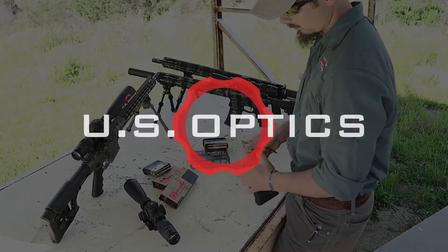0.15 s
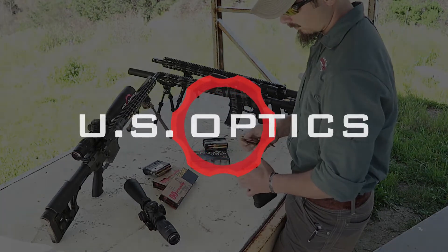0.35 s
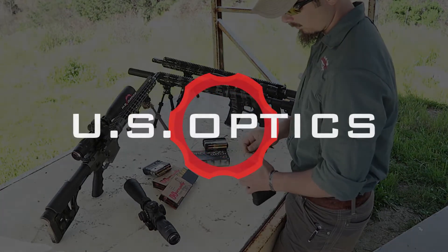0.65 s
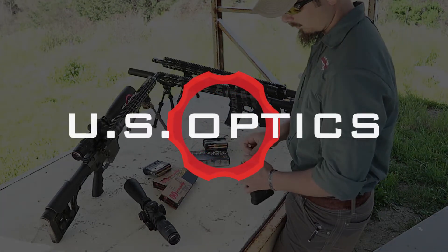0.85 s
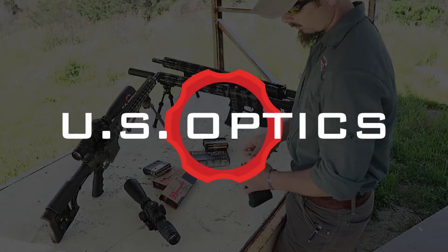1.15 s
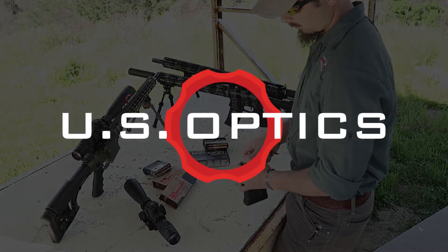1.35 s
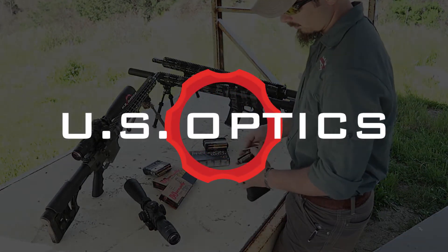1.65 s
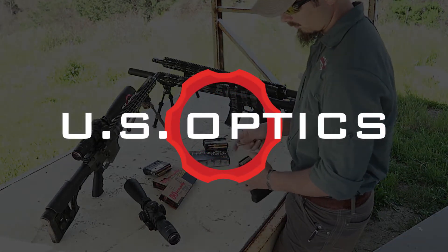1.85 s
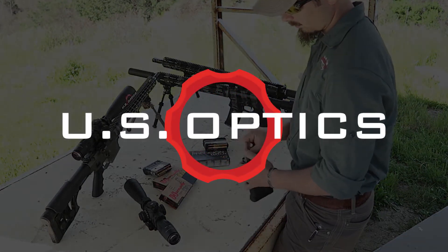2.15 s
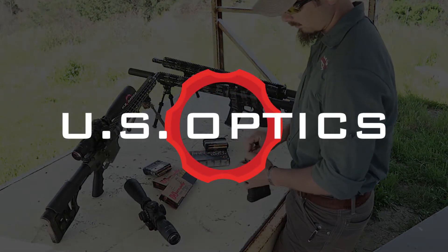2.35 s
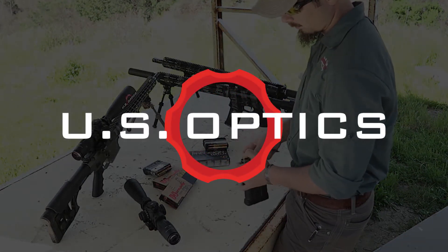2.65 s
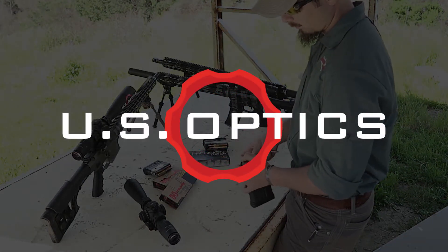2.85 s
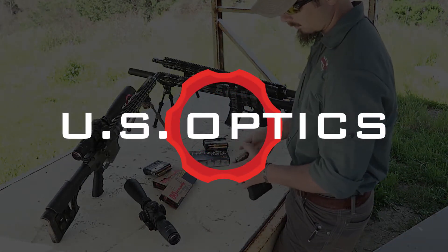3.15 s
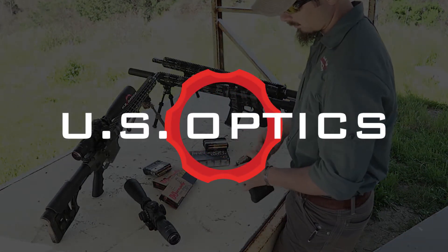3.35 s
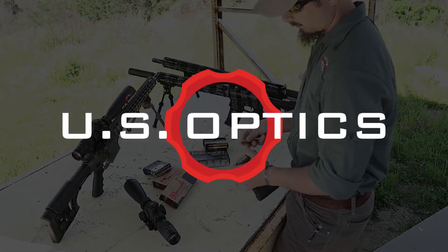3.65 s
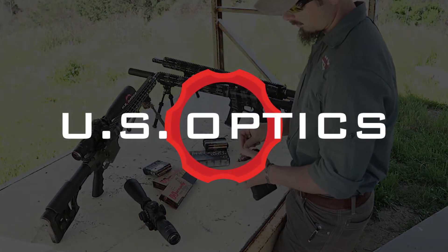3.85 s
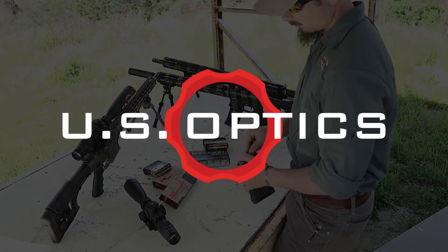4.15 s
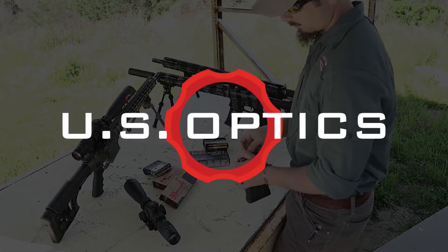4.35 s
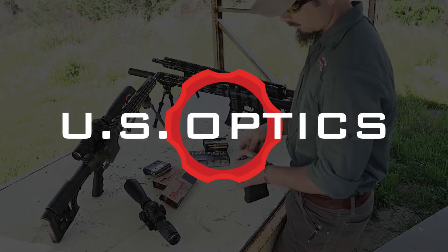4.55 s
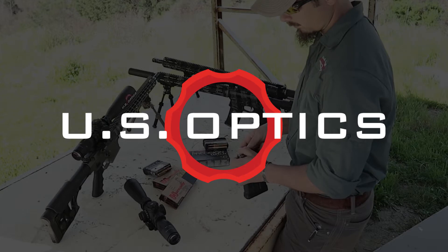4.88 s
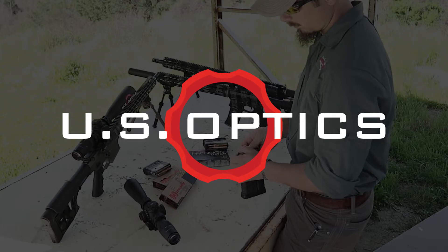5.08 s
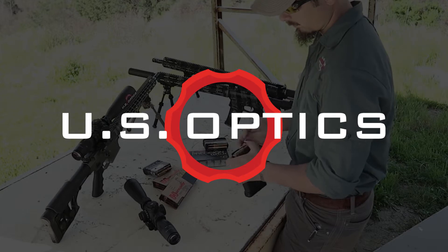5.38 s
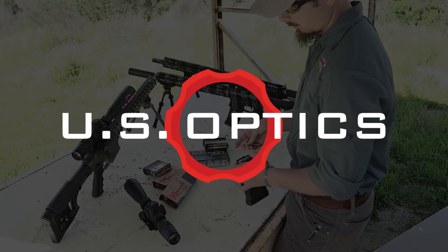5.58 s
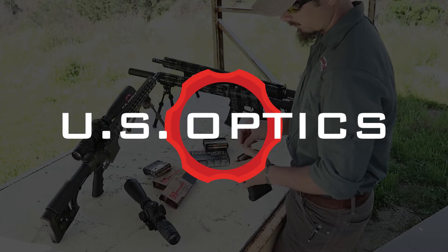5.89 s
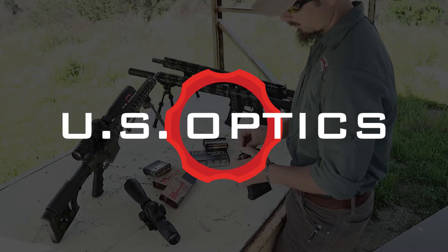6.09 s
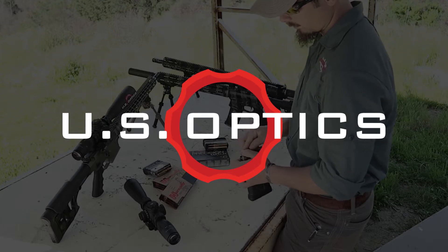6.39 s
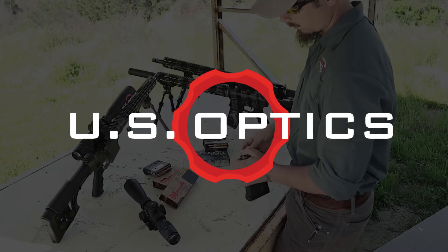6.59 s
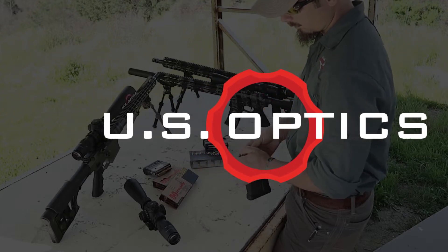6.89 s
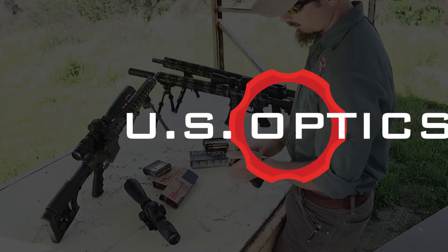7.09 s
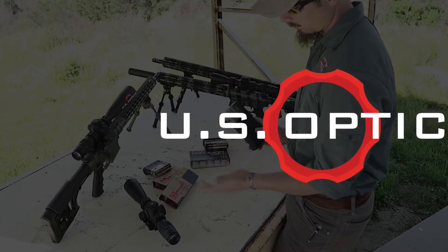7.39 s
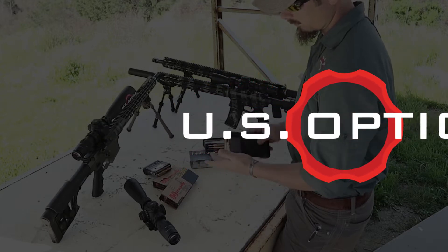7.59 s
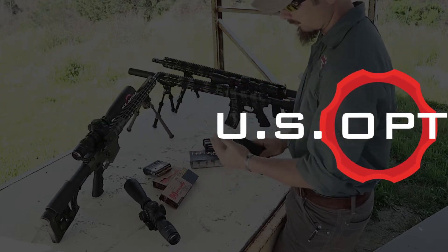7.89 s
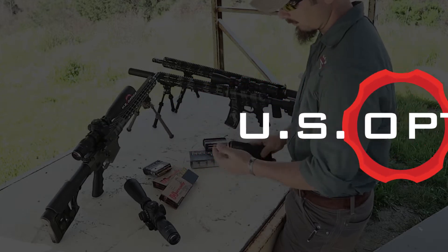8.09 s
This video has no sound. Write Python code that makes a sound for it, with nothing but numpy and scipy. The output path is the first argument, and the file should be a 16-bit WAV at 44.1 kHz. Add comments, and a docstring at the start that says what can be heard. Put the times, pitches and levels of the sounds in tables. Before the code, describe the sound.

Rifle cartridges are pressed one by one into a magazine with sharp, irregular clicks, over faint crickets and birds outdoors.

```python
"""At an outdoor bench under a roof, cartridges are picked from a box and pressed into a magazine.
Each impact excites the damped modes of magazine, spring and brass; friction drives the same modes
as a round slides under the feed lips, then it snaps home and the bench thuds. Crickets, birds, low
rumble and wind on the microphone lie behind. Air, rumble, peeps and far trills sink after each
hard blow and creep back."""
import sys
import numpy as np
from scipy import signal
from scipy.fft import rfft, irfft, next_fast_len
from scipy.io import wavfile
from scipy.ndimage import uniform_filter1d

SR = 44100
rng = np.random.default_rng(int(sys.argv[2]) if len(sys.argv) > 2 else 0)


def waveform_to_disk(signal):
    """Save audio, clipped to [-1, 1], as 16-bit WAV at the path in sys.argv[1]."""
    frames = np.transpose(np.atleast_2d(signal))
    scaled = np.clip(frames, -1, 1) * 32767
    samples = np.round(scaled).astype(np.int16)
    wavfile.write(sys.argv[1], SR, samples)


N = 362943


def from_db(db):
    """Amplitude ratio of a level in decibels."""
    return 10 ** (np.asarray(db) / 20)


def rms_one(x):
    """Normalisation to unit rms."""
    return x / np.sqrt(np.mean(x ** 2) + 1e-20)


def in_time(rows):
    """Linear interpolation of each column at every sample."""
    s, *columns = np.transpose(rows)
    return [np.interp(np.arange(N) / SR, s, c) for c in columns]


def at_hz(points, hz):
    """Interpolation on a logarithmic frequency axis."""
    freqs, values = np.transpose(points)
    return np.interp(np.log(hz), np.log(freqs), values, left=-80, right=values[-1])


def add(out, sound, s):
    """Superposition of a sound from time s on."""
    i = round(s * SR)
    out[..., i:i + sound.shape[-1]] += sound[..., :N - i]


def left_right(mid_side):
    """Sum and difference turn mid and side into left and right."""
    return mid_side[..., :1, :] + mid_side[..., 1:, :] * [[1], [-1]]


def ring(x, hz, t60):
    """Damped resonator: its impulse response is a decaying sine of height 1."""
    r, w = from_db(-60 / (t60 * SR)), 2 * np.pi * hz / SR
    return signal.lfilter([0, np.sin(w)], [1, -2 * r * np.cos(w), r * r], x)


def note(hz, length, bend):
    """Frequency modulation: a soft tone arches up to hz from the fraction bend below it, and back."""
    share = np.linspace(0, 1, round(length * SR))
    pitch = hz * (1 - bend * (2 * share - 1) ** 2)
    return np.sin(np.pi * share) * np.sin(2 * np.pi * np.cumsum(pitch) / SR)


def grit(shape):
    """Uneven micro-impacts: noise with a heavy-tailed amplitude distribution."""
    return rng.standard_normal(shape) * from_db(2.5 * np.minimum(rng.exponential(1, shape), 5))


def scatter(x, level_db, t60):
    """Diffuse reflection: convolution with decaying noise, different on each side."""
    t = np.arange(round(t60 * SR)) / SR
    tail = rng.standard_normal((2, len(t))) * from_db(level_db - 60 * t / t60)
    return signal.fftconvolve(x[None], tail, axes=1)[:, :N]


# Left-right coherence of the background: f/Hz, coherence (negative values act as 0)
COHERENCE = [(60, 0.98), (130, 0.94), (290, 0.57), (640, 0.48), (1410, -0.95), (3100, -0.24), (6820, -0.25),
             (15000, -0.68)]

def coloured_noise(spectrum):
    """Partial coherence: independent mid and side noises mix to shaped stereo noise of unit rms."""
    size = next_fast_len(N)
    hz = np.maximum(np.fft.rfftfreq(size, 1 / SR), 1)
    white = rfft(rng.standard_normal((2, size)))
    mid, side = white * from_db(at_hz(spectrum, hz)) * (hz < spectrum[-1][0])
    alike = np.clip(at_hz([(0.77, 0.89)] + list(COHERENCE), hz), 0, 1)
    stereo = np.sqrt(1 + alike) * mid + np.sqrt(1 - alike) * side * [[1], [-1]]
    return rms_one(irfft(stereo, size)[:, :N])


# Hardest blows: t/s, level/dB of the bench thud, level/dB to which the air then sinks
HARD_BLOWS = [(1.384, -31, -65), (3.0, -28.5, -65), (3.994, -55.5, -62.5), (5.161, -43, -67.5),
              (6.894, -44, -68), (7.596, -36.5, -68.5), (7.956, -32, -67.5)]

def air_level(start_db=-67, sink_s=0.11, creep_db_per_s=7.5):
    """Level envelope in dB: the background sinks after each hard blow and recovers at an even rate."""
    rows = [(0, start_db)]
    for s, _, low_db in list(HARD_BLOWS) + [(N / SR, 0, 0)]:
        last_s, last_db = rows[-1]
        rows += [(s, last_db + creep_db_per_s * (s - last_s)), (s + sink_s, low_db)]
    return in_time(rows)[0]


# Spectrum of the open air: f/Hz, relative density level/dB
AIR_SPECTRUM = [(140, -31), (230, -7.5), (350, -7.5), (405, -5.5), (476, -11.5), (867, -12), (1300, -10.5),
                (1660, -14), (2650, -17.5), (5140, -23.5), (11000, -34), (14300, -65), (22000, -120)]

def open_air(air_db, whine_hz=15622, whine_db=-16):
    """Broadband noise and a thin pure tone share one envelope."""
    whine = from_db(whine_db) * np.sin(2 * np.pi * whine_hz * np.arange(N) / SR)
    return from_db(air_db) * (coloured_noise(AIR_SPECTRUM) + whine)


# Spectra of the deep and upper rumble: f/Hz, relative density level/dB
DEEP_SPECTRUM = [(12, -25), (25, -14.5), (40, -15), (52, -8.5), (62, 5.5), (72, -10.5), (90, -12),
                 (110, -10), (140, -41.5)]
UPPER_SPECTRUM = [(56, -48), (95, -11), (156, 1.5), (183, -6), (205, -6), (300, -22), (390, -41),
                  (660, -120)]
# Swell of the rumble: t/s, deep level/dB, upper level/dB (both re the air)
RUMBLE_LEVELS = [(0, 8.5, 8.5), (.45, 18, 13.5), (.8, 3, 9.5), (1.2, 6, 15), (1.55, 6, 7.5), (2, 11, 8.5),
                 (2.8, 5.5, 10), (3.1, 5, 7.5), (4, 11.5, 5), (5.4, 6.5, 3), (7.3, 11, 6), (7.7, 5.5, 5.5),
                 (8.23, 10.5, 8.5)]

def rumble(air_db):
    """Slow amplitude modulation of two low noise bands."""
    deep_db, upper_db = in_time(RUMBLE_LEVELS)
    deep = from_db(deep_db) * coloured_noise(DEEP_SPECTRUM)
    upper = from_db(upper_db) * coloured_noise(UPPER_SPECTRUM)
    return from_db(air_db) * (deep + upper)


# Gusts on the microphone: t/s, mean level/dB, f/Hz
GUSTS = [(.27, -35, 91), (0.312, -29.5, 98.5), (0.503, -42, 78), (1.271, -36, 43.6), (2.167, -49, 51),
         (2.702, -37, 54), (2.871, -31.5, 59.5), (3.779, -33, 59.7), (3.81, -39.5, 82), (7.273, -37, 93.5),
         (7.329, -41, 79.8), (8.141, -44, 120.5)]

def wind_puffs():
    """Gust pressure displaces the membrane for about two uneven cycles."""
    out = np.zeros((2, N))
    for s, level_db, hz in GUSTS:
        gains = from_db(level_db + rng.normal(0, 4.0, (2, 1)))
        add(out, gains * note(hz, 2.07 / hz, bend=0.42), s)
    return out


# Dove-like coos and a warbling bird: t/s, duration/s, top f/Hz, level/dB
COO_NOTES = [(1.0, 0.24, 513, -62), (2.56, 0.41, 381, -60), (3.841, 0.14, 404, -66),
             (7.628, 0.075, 403, -64)]
WARBLE_NOTES = [(2.066, .035, 3500, -69), (2.103, 0.041, 3550, -64.5), (2.198, .045, 3950, -62),
                (2.357, .035, 3850, -59), (2.39, .035, 3850, -60), (2.67, .035, 3660, -66),
                (2.705, .05, 3590, -57)]

def far_birds():
    """Gliding pure tones: the pitch arches slightly in a coo, widely in a warble."""
    out = np.zeros(N)
    for notes, bend in [(COO_NOTES, 0.046), (WARBLE_NOTES, 0.2)]:
        for s, length, hz, level_db in notes:
            add(out, from_db(level_db) * note(hz, length, bend), s)
    return out


def far_crickets(air_db, first_s=0.645, period_s=0.2835, trill_s=0.13, trill_db=-15.5):
    """Trills blur to narrow-band noise, modulated on an even beat; a lower cricket answers each."""
    hiss = rng.standard_normal(N)
    high = rms_one(ring(hiss, hz=5300, t60=0.018))
    low = rms_one(ring(hiss, hz=4450, t60=0.013))
    beat = np.zeros(N)
    for s in np.arange(first_s, N / SR, period_s):
        add(beat, from_db(trill_db) * np.sqrt(np.hanning(round(trill_s * SR))), s)
    trills = beat * high
    add(trills, from_db(-4.5) * beat * low, s=0.12)
    return from_db(air_db) * trills


# Bouts of peeps: first t/s, last t/s, mean level/dB re the air
PEEP_BOUTS = [(0.071, 0.7565, 5), (1.125, 1.241, -1.5), (1.585, 2.172, -0.5), (2.639, 2.871, 1.5)]

def peeping_bird(air_db, hz=2870, peep_s=0.03, period_s=0.116):
    """A periodic train of tone bursts, with slight jitter in pitch and level."""
    out = np.zeros(N)
    for first, last, level_db in PEEP_BOUTS:
        for s in np.linspace(first, last, round((last - first) / period_s) + 1):
            peep = note(hz * rng.normal(1, 0.0019), peep_s, bend=0.11)
            add(out, from_db(level_db + rng.normal(0, 1.5)) * peep, s - peep_s / 5)
    return from_db(air_db) * out


# Chirps: t/s, level/dB towards which the pulses rise, number of pulses
CHIRPS = [(.096, -54, 3), (0.367, -52, 3), (.608, -50.5, 3), (1.14, -47.5, 3), (3.228, -55.5, 4),
          (3.473, -51, 4), (6.527, -49.5, 4), (7.113, -64, 4)]

def near_cricket(hz=5140, period_s=0.0194, step_db=2.8):
    """Stridulation: wing teeth catch unevenly, in raspy pulses of rising pitch and level."""
    out = np.zeros(N)
    for s, level_db, pulses in CHIRPS:
        for k in range(round(pulses)):
            pulse = note(hz * (1 + 0.017 * (k - 1)), length=0.01, bend=0.045)
            rasp = 1 + 2.0 * uniform_filter1d(rng.standard_normal(len(pulse)), size=40)
            gain = from_db(level_db - step_db * (round(pulses) - k))
            add(out, gain * pulse * rasp, s + k * period_s)
    return out


def bench_thuds(hz=210, t60=0.019):
    """Impulse response of the board: each hard blow drives two low resonators in series."""
    impulses = np.zeros(N) + 1e-18
    for s, level_db, _ in HARD_BLOWS:
        impulses[round(s * SR)] = from_db(level_db)
    return ring(ring(impulses, hz, t60), 1.4 * hz, t60) / 30   # offsets the resonant gain


# Brass rubbing on brass: start t/s, strongest t/s, end t/s, peak level/dB
RUBS = [(3.345, 3.39, 3.44, -51), (3.56, 3.67, 3.7, -66)]

def brass_rubs(hz=6020, rise_db=23, fall_db=29):
    """Friction drives one narrow brass mode, swelling and dying."""
    out = np.zeros(N)
    for start, top, end, peak_db in RUBS:
        t = np.arange(start, end, 1 / SR)
        level_db = peak_db - np.interp(t, [start, top, end], [rise_db, 0, fall_db])
        add(out, from_db(level_db) * rms_one(ring(grit(len(t)), hz, t60=0.025)), start)
    return out


# Six bands: lower f/Hz, upper f/Hz
BAND_EDGES = [(450, 1200), (1200, 1850), (1850, 2750), (2750, 4300), (4300, 6800), (6800, 12500)]
# Per band: level/dB of the unpitched crack; level/dB of side re mid
CRACK_DB = [8, -8.5, -3, -8, -4, 6.5]
SIDE_DB = [-18.5, -21.5, -12, -12.5, -7.5, -1.5]
# Modes of magazine, spring and brass: f/Hz, level/dB, T60/s
MODES = [(564, -21, 0.029), (762, -8.5, .025), (957, 5, 0.025), (1000.7, 0.5, 0.096), (1440, -11.5, 0.09),
         (1510, 2.5, 0.021), (1476.5, 9, 0.034), (1599.5, 0.5, 0.12), (1600, -6, 0.078), (1966, -4, 0.025),
         (2136, -3, 0.087), (2180, -0.5, 0.039), (2328, 1, 0.027), (2600, -10, 0.046), (3034, 7, 0.0059),
         (3370, 1.5, 0.016), (3660, -1, 0.0079), (4165, -9, .015), (4990, -4, 0.0071), (5360, 0, 0.009),
         (5827, 0.5, 0.014), (6306, -1.5, 0.006), (7740, -14, 0.013), (8073, -9, 0.013)]

def struck_parts(force, band, ringing_db, t60_scale):
    """Modal superposition in one band: the crack plus randomly weighted modes, as mid and side."""
    low, high = BAND_EDGES[band]
    force = signal.sosfilt(signal.butter(2, [low, high], "band", fs=SR, output="sos"), force)
    out = from_db(CRACK_DB[band]) * force
    for hz, level_db, t60 in MODES:
        if low <= hz < high:
            strength = from_db(level_db + ringing_db + rng.normal(0, 4.2, force.shape[:-2] + (1, 1)))
            held_t60 = t60_scale * t60   # the grip sets the damping
            out = out + strength * ring(force, hz, held_t60) * 6.6 / np.sqrt(held_t60 * SR)
    return out * from_db([[0], [SIDE_DB[band]]])


# A round is pushed under the lips, ever harder: start t/s, end t/s, final force level/dB
PUSHES = [(0.868, 0.909, -51.5), (0.964, 0.991, -49.5), (1.331, 1.386, -38.5), (2.957, 3.011, -40.5),
          (3.982, 3.997, -41.5), (5.113, 5.165, -37), (6.27, 6.302, -56.5), (6.331, 6.374, -45),
          (6.811, 6.89, -54)]
# Rounds drag on each other and come to rest: start t/s, end t/s, force level/dB the fall starts from
DRAGS = [(0.988, 1.015, -42.5), (2.256, 2.296, -46), (2.424, 2.468, -53.5), (2.507, 2.561, -42),
         (4.128, 4.15, -41), (4.335, 4.375, -51), (6.474, 6.515, -50)]
# Colour of sliding: level/dB per band
SLIDE_DB = [-7, -7.5, -2.5, -7, -11, -12.5]

def slides(rise_db=20, fall_db=21, release_t60=0.043):
    """Sliding friction forces the modes; it sets in softly and dies away fast."""
    out = np.zeros((2, N))
    strokes = [(start, end, db - rise_db, db) for start, end, db in PUSHES]
    strokes += [(start, end, db, db - fall_db) for start, end, db in DRAGS]
    for start, end, start_db, end_db in strokes:
        share = np.linspace(0, 1, round((end - start) * SR))
        stroke = from_db(start_db + (end_db - start_db) * share) * np.minimum(share / 0.71, 1)
        release = from_db(end_db - 60 * np.arange(SR // 20) / SR / release_t60)
        envelope = np.append(stroke, release)
        force = envelope * grit((2, len(envelope)))
        bands = [from_db(db) * struck_parts(force, band, ringing_db=-4, t60_scale=0.77)
                 for band, db in enumerate(SLIDE_DB)]
        add(out, left_right(sum(bands)), start)
    return out


# Impacts: t/s, level/dB, treble tilt/(dB per band), tail level/dB re the chatter
KNOCKS = [(.339, -27.5, 0.014, -9), (.488, -29, -2.3, -3), (1.973, -35, 0.2, 3), (3.443, -37, 1.7, 13),
          (3.598, -31.5, -0.77, -9.5), (4.866, -30, .9, 2), (7.912, -27.5, -0.89, -9)]     # the box on the bench
CLINKS = [(.133, -36, -1.5, 6), (.224, -42.5, -1.6, -22), (.551, -31.5, 1.2, -1), (.903, -11.5, -1.4, -11),
          (1.72, -27.5, 3.3, -5), (1.827, -36, -2, -3), (1.886, -24, -.6, -4), (2.257, -13, -3.1, 1),
          (3.35, -38.5, 1.2, -11), (3.378, -40, 1.8, -6), (3.762, -35.5, 1.7, 14)]     # brass on brass
RATTLES = [(.827, -10.5, -0.8, -7.5), (.838, -17.5, -0.8, 2), (.847, -22, -3, -30), (.916, -30, 4.8, -4),
           (.985, -21, -0.6, -1.5), (1.91, -37.5, 2.2, 9), (2.286, -22.5, 3, -10.5),
           (2.369, -37.5, -2, -12), (2.415, -35.5, -8.5, -1), (2.426, -31.5, 3.5, -9),
           (2.509, -34, -3, -17), (2.527, -32, 1, 3), (3.979, -19, 1.8, 2)]   # case walls against each other
TAPS = [(.018, -38, 0.5, -2), (1.515, -27, 2.3, -4.5), (1.563, -43.5, -2, 5), (2.298, -26, 1.2, -27),
        (2.688, -37.5, -0.2, -14), (3.13, -33.5, 2.8, 2.5), (3.905, -31, 1, -9), (4.135, -19, 2.7, 4.5),
        (4.481, -35.5, 0.5, -11.5), (5.298, -32.5, 0, -4), (5.395, -50, -.6, -12), (5.659, -39.5, -1, -8),
        (5.677, -43, 4.5, -8), (5.83, -48, 1.5, 0.5), (6.135, -19, -1.5, 0), (6.143, -18.5, -2.5, -29),
        (6.172, -42, -2, 0), (6.313, -8.5, 2.9, -4.5), (6.367, -11, 0.9, 1), (6.42, -33, 2, -4),
        (6.5, -30, -0.5, -3)]         # a round on the hollow magazine
SNAPS = [(1.383, 4, 0.4, -22.5), (1.39, -12, 3, -4), (3.0, 2, -2.1, -19), (3.996, -4, -0.2, -12),
         (5.159, -2.5, 2, -23), (5.176, -5.5, 1, -11), (6.105, -29, 3.5, -33.5), (6.891, -1.5, 0.8, -14),
         (6.902, -0.5, 0.85, -12), (7.595, -4, 0.4, -9.5), (7.954, -9.5, 0.3, -6)]       # a round snaps home under the feed lips, often with a rebound
# Timbre of each kind: ringing level/dB, T60 factor, then relative peak level/dB in the six bands
KNOCK_TIMBRE = (-10.5, 0.95, -12.5, -15.5, -21, -20.5, -28.5, -37)
CLINK_TIMBRE = (2, 1.3, -42.5, -26, -23.5, -16.5, -8, -19.5)
RATTLE_TIMBRE = (5, 1.16, -30.5, -18.5, -7.5, -7, -16.5, -22.5)
TAP_TIMBRE = (8.5, 1.25, -20, -7, -18.5, -14.5, -22.5, -31.5)
SNAP_TIMBRE = (0.5, 0.4, -20, -10, -11, -12, -16, -19.5)
# The treble leans left: level/dB of left re right, per band
PAN_DB = [0, .3, 0.502, 0.801, 1.2, 1.5]

def impacts(chatter_s=0.003, onset_s=0.0011, tail_t60=0.088):
    """Impact excitation: a cluster of collisions rings the parts; bench and roof scatter a short tail."""
    kinds = [(SNAPS, SNAP_TIMBRE), (TAPS, TAP_TIMBRE), (RATTLES, RATTLE_TIMBRE),
             (CLINKS, CLINK_TIMBRE), (KNOCKS, KNOCK_TIMBRE)]
    out = np.zeros((2, N))
    t = np.arange(SR // 6) / SR
    chatter = np.exp(-(t / chatter_s) ** 2)
    onset = 1 - np.exp(-t / onset_s)   # the force builds over the first collisions
    for table, (ringing_db, t60_scale, *colour_db) in kinds:
        start, level_db, tilt_db, tail_db = np.transpose(table)[:, :, None, None]
        tail = from_db(tail_db - 60 * t / tail_t60)
        force = onset * (chatter + tail) * grit((len(table), 2, len(t)))
        sounds = 0
        for band, pan_db in enumerate(PAN_DB):
            part = struck_parts(force, band, ringing_db, t60_scale)
            mid_peak = np.abs(part[:, :1]).max(axis=-1, keepdims=True)
            from_centre = band - (len(BAND_EDGES) - 1) / 2
            part = part / mid_peak * from_db(level_db + colour_db[band] + tilt_db * from_centre)
            sounds = sounds + left_right(part) * from_db([[pan_db / 2], [-pan_db / 2]])
        for s, sound in zip(start.ravel(), sounds):
            add(out, sound, s)
    return out


def scene(roof_band_hz=(1000, 2800)):
    """Superposition of background, calls and handling, with diffuse returns from trees and roof."""
    air_db = air_level()
    background = open_air(air_db) + rumble(air_db)
    hands = impacts() + slides() + brass_rubs() + bench_thuds()
    calls = peeping_bird(air_db) + near_cricket() + far_crickets(air_db) + far_birds()
    roof_filter = signal.butter(2, roof_band_hz, "band", fs=SR, output="sos")
    roof = scatter(signal.sosfilt(roof_filter, hands.mean(axis=0)), level_db=-51, t60=0.4)
    trees = scatter(calls, level_db=-28, t60=0.14)
    return background + wind_puffs() + calls + trees + hands + roof


def record(dry, ceiling=0.43, stop_hz=17000):
    """Soft saturation squashes the peaks; a low-pass filter cuts the top."""
    squashed = dry / (1 + np.abs(dry / ceiling) ** 4) ** 0.25
    return signal.sosfilt(signal.cheby2(12, 70, stop_hz, fs=SR, output="sos"), squashed)


dry = scene()
out = record(dry)
waveform_to_disk(out)
```